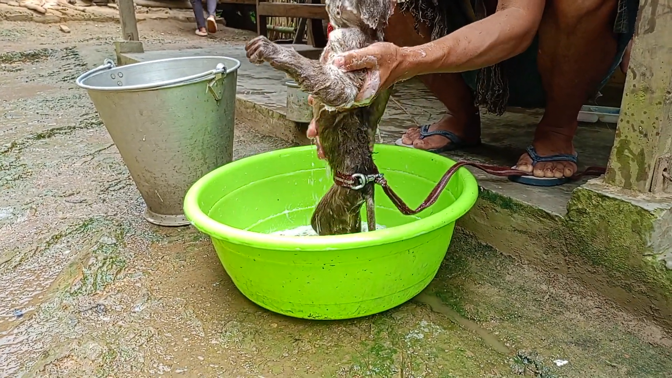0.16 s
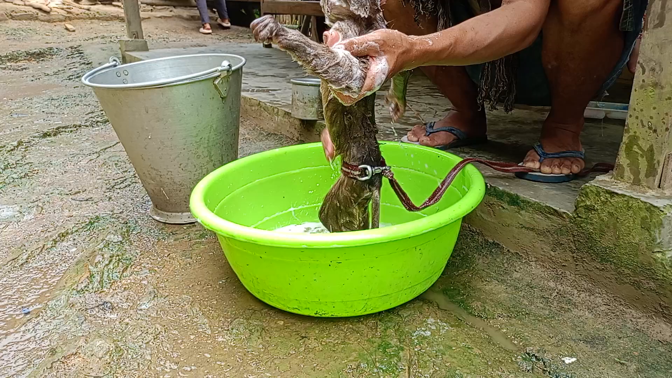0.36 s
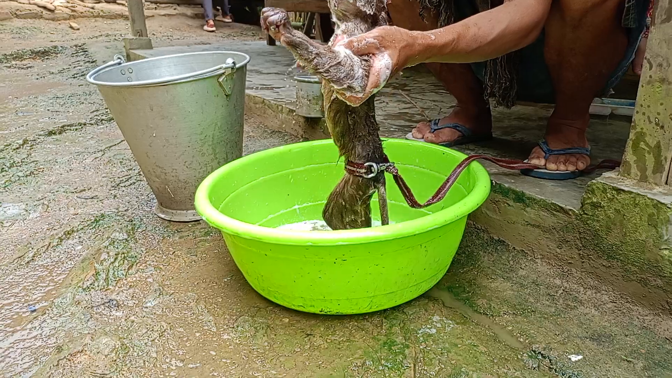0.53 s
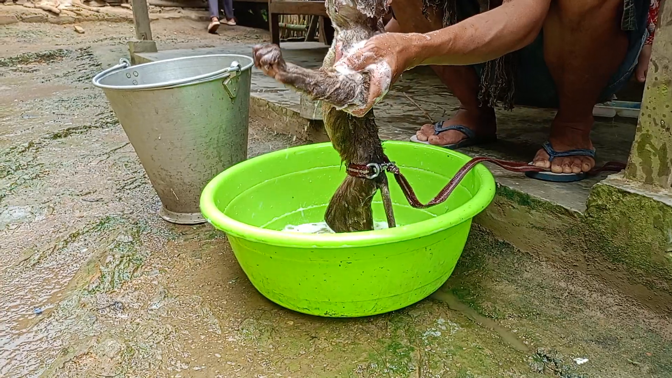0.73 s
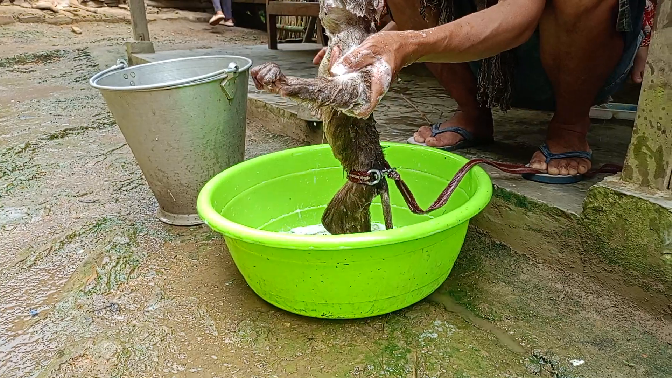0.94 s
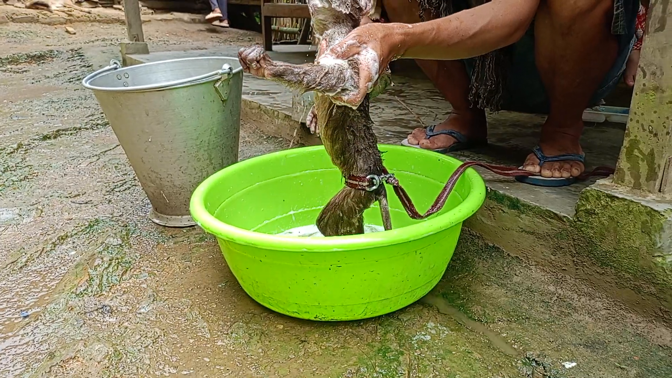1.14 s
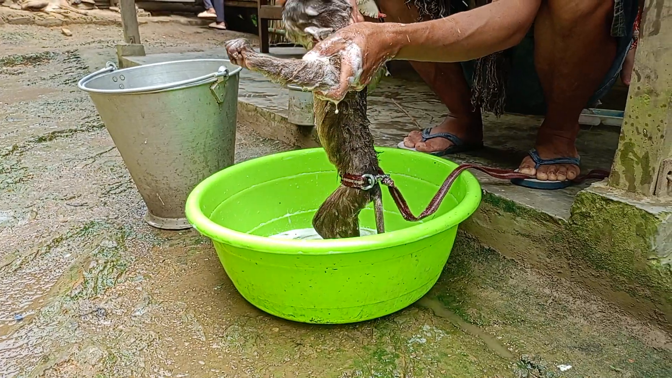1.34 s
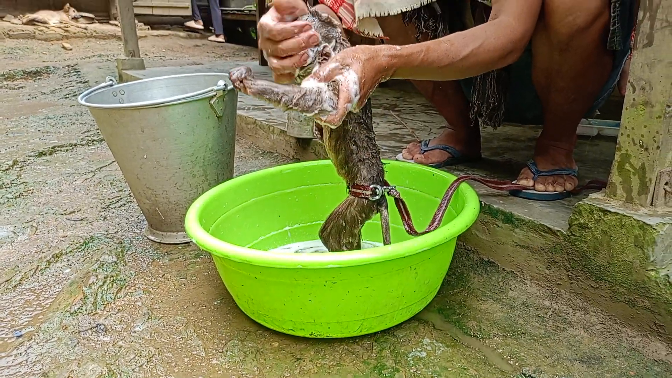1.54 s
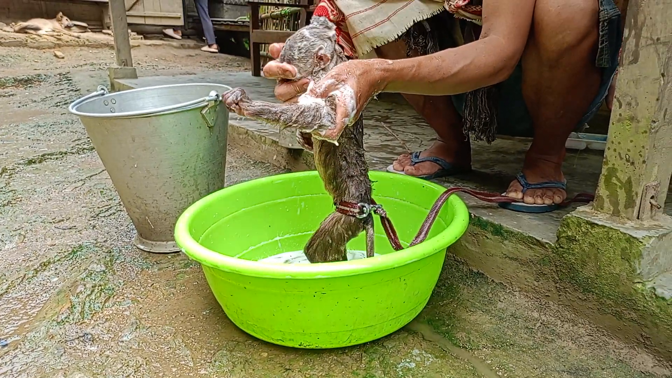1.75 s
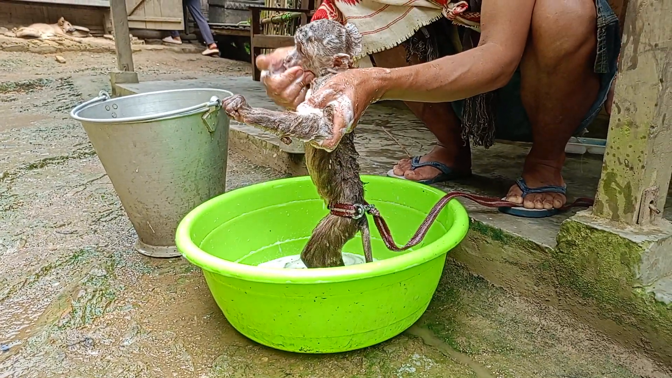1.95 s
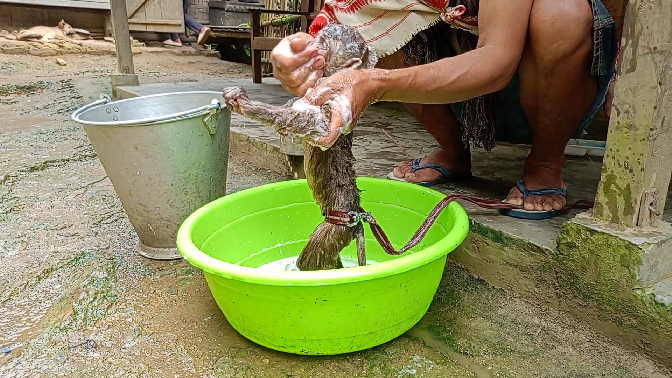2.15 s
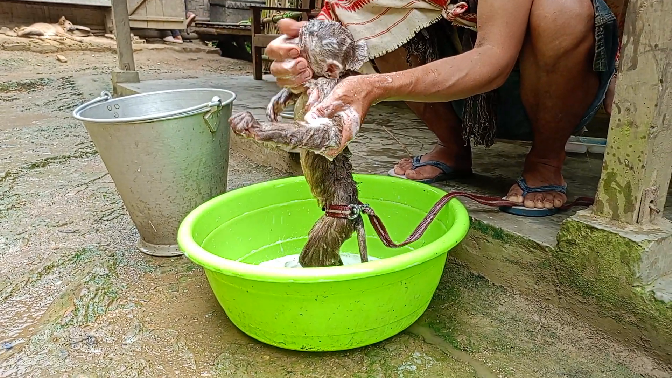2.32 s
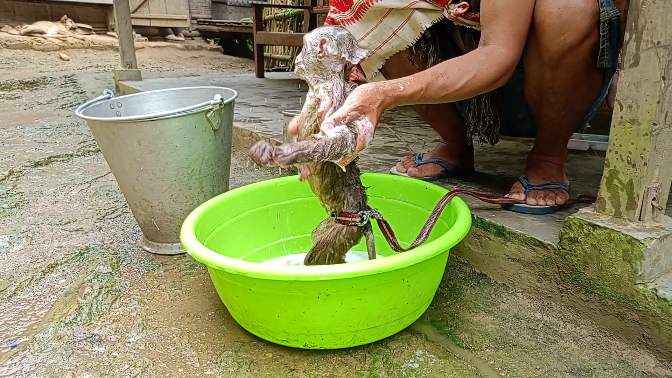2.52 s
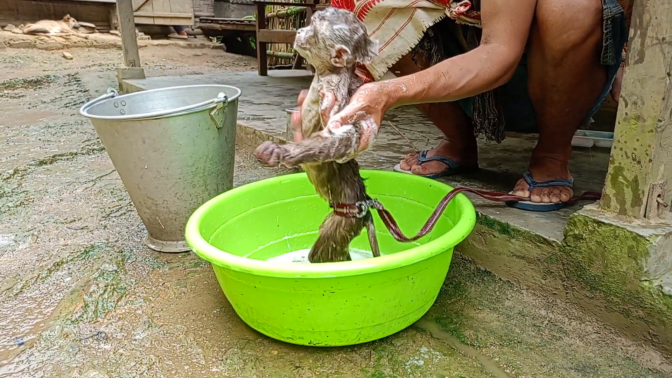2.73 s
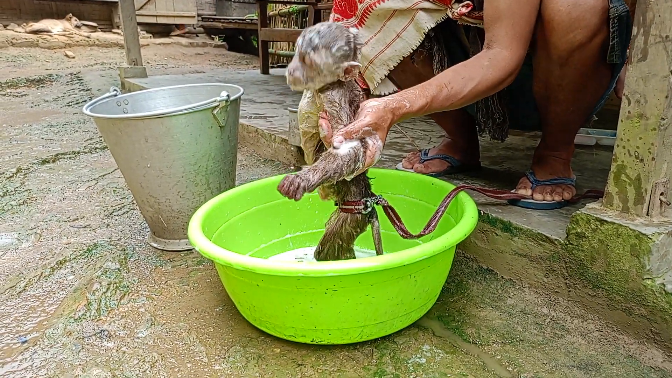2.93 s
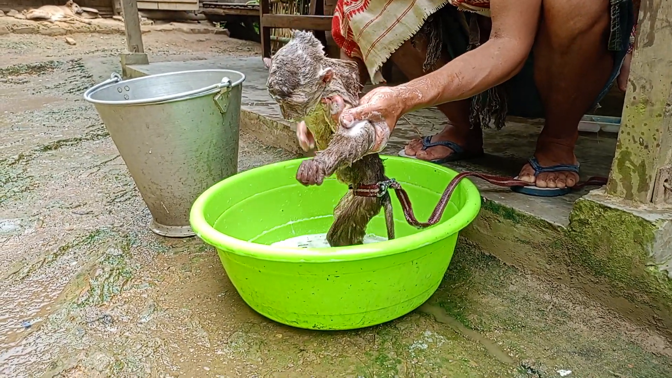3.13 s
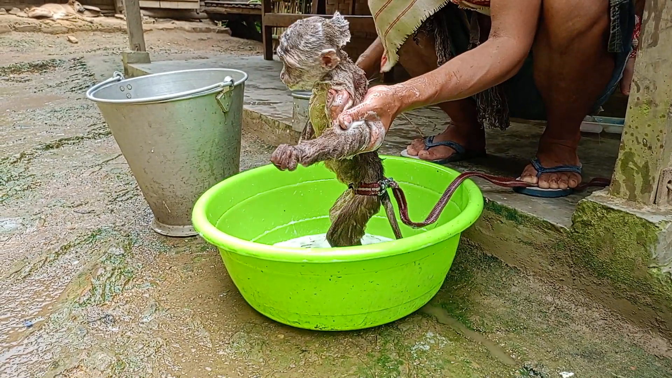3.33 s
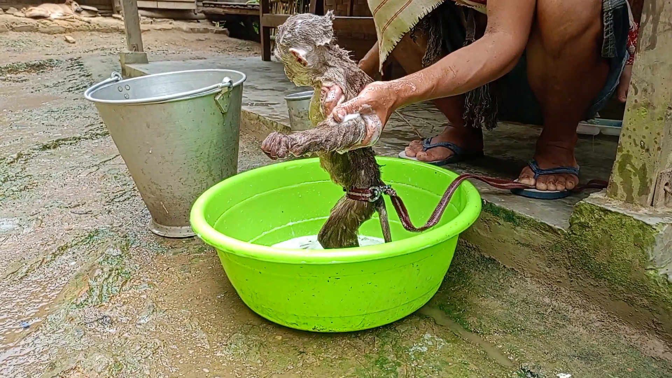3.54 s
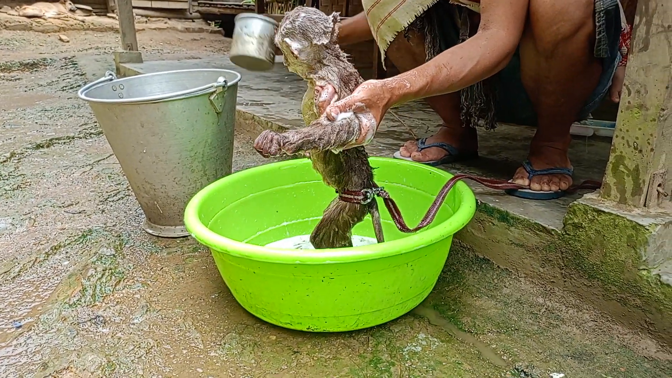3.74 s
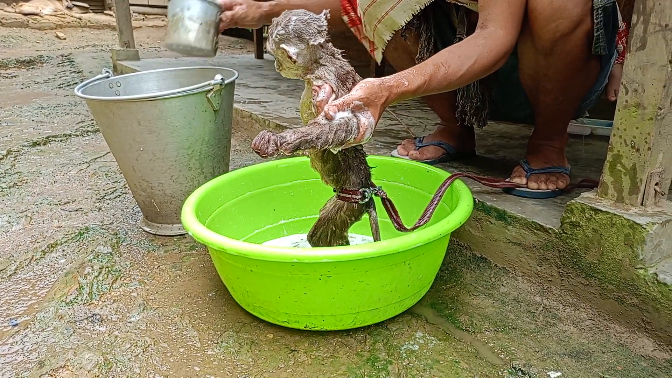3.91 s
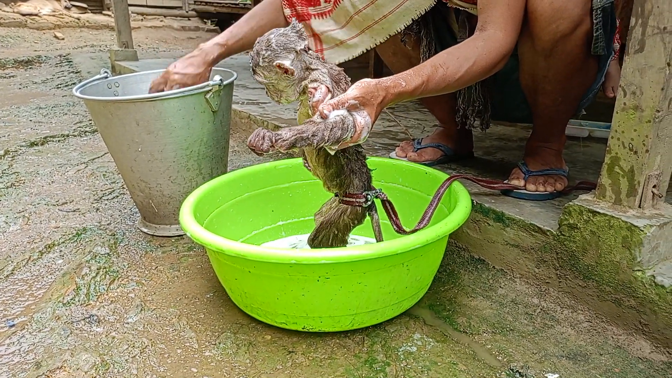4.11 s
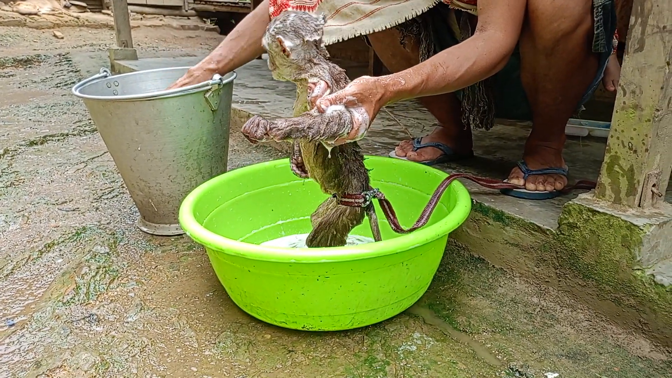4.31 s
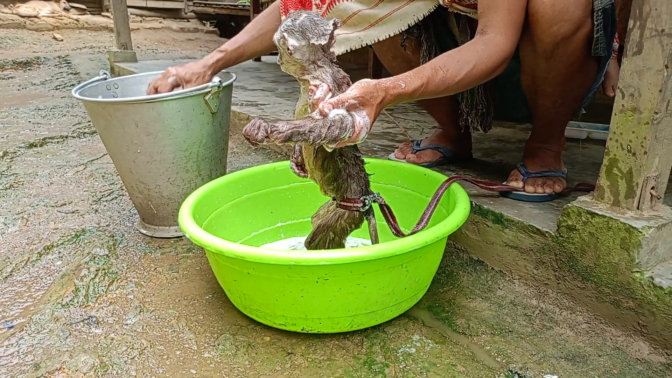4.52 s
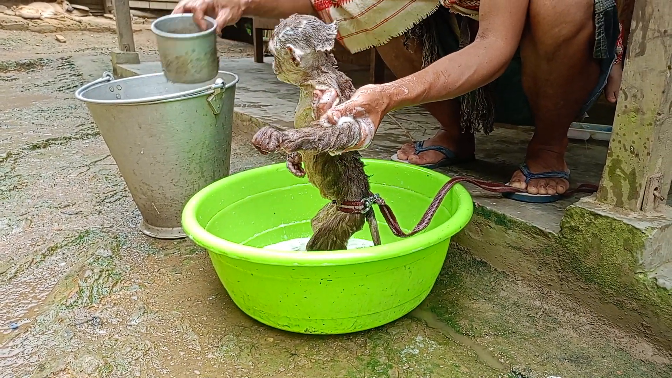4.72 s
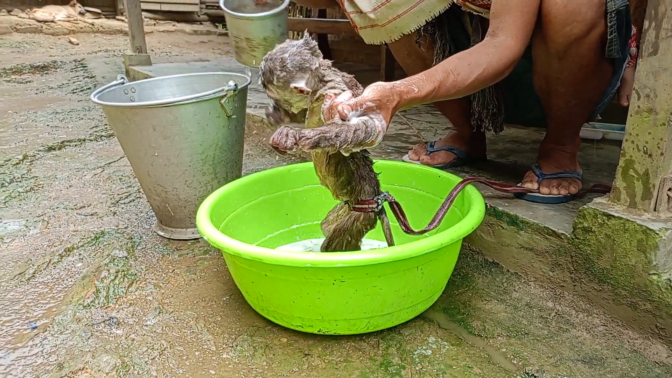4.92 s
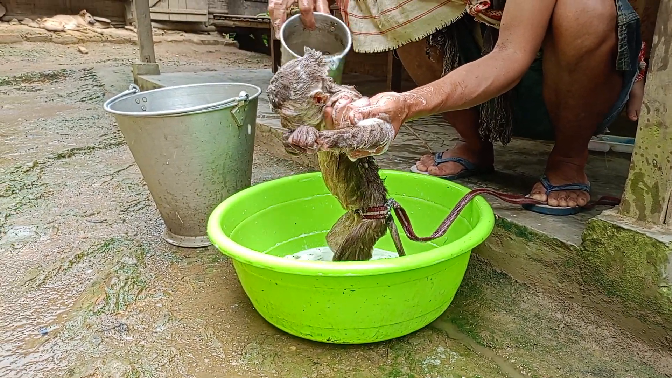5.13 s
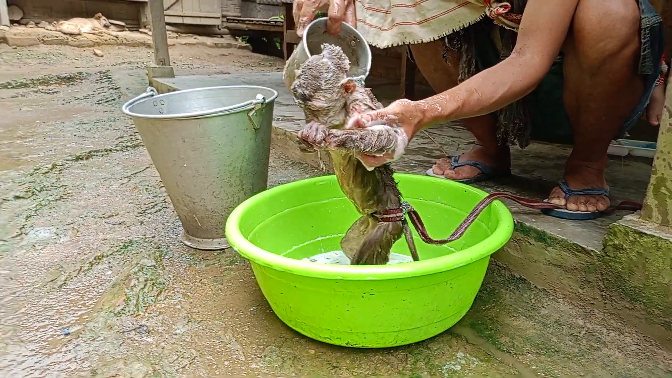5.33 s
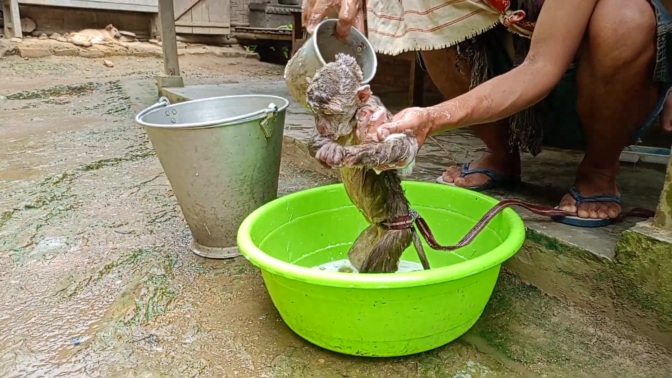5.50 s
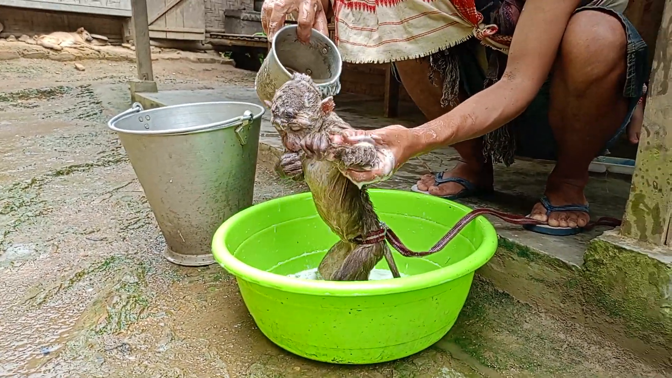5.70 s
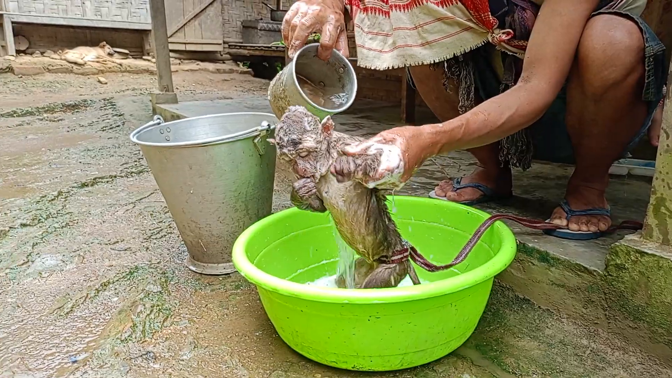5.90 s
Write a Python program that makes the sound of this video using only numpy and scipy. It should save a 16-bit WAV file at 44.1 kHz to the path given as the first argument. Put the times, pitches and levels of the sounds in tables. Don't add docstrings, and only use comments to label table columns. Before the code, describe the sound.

Steady insect hiss in a yard, soft wet rubbing and small slaps, then a metal cup knocks, plunges into a bucket, clanks out and drips.

```python
import sys
import numpy as np
from scipy import signal
from scipy.fft import rfft, irfft
from scipy.io import wavfile
from scipy.ndimage import uniform_filter1d

SR = 44100
rng = np.random.default_rng(int(sys.argv[2]) if len(sys.argv) > 2 else 0)


def wav_record(signal):
    frames = np.transpose(np.atleast_2d(signal))
    bounded = np.clip(frames, -1, 1)
    quanta = np.round(bounded * 32767).astype(np.int16)
    wavfile.write(sys.argv[1], SR, quanta)


def decibels_to_gain(level_db):
    exponent = np.asarray(level_db, float) / 20
    return 10 ** exponent


N = 267246

# pitch_hz, level_db (per Hz)
FAR_WATER = [(18, -65), (40, -34), (90, -18), (380, -18.5), (430, -13), (500, -13), (620, -13.5),
             (1000, -14), (1750, -10.5), (1900, -7.5), (2000, -0.5), (2120, -15.5), (2400, -91)]
# pitch_hz, level_db (per Hz)
LOW_INSECTS = [(1700, -77), (2150, -6.5), (2350, 0), (3050, -1.5), (3350, -5.5), (3800, -2.5), (4300, -6.5),
               (4600, -17.5), (5000, -21), (6300, -21.5), (7300, -17), (7900, -99)]
# pitch_hz, level_db (per Hz)
CICADAS = [(6800, -89), (7400, -16.5), (7700, -11), (8800, -8.5), (9200, -16.5), (9500, -22.5),
           (10500, -28.5), (11000, -40.5), (12300, -45.5), (13600, -55), (14900, -38), (15750, -43),
           (15850, -92)]
# time_s, level_db
RUBBING = [(0, -51), (.5, -53), (.8, -52), (1.0, -55.5), (1.28, -56), (1.34, -53), (1.62, -52.5),
           (2.75, -54.5), (3.3, -53.5), (4.1, -54), (4.92, -51.5), (5.25, -52.5), (6.06, -51.5)]
# pitch_hz, share_0_to_1
RUBBING_SHARE = [(900, 0.18), (1400, 0.85), (2200, 0.84), (4200, 0.7), (5500, 0), (9000, 0.33)]
YARD_DB, PATCHY_DB = -53, 1.25
SWELL_DB, SWELL_S, SWELL_TOP_S, TIRE_DB_PER_S = 0.7, 1.75, 1.0, -.25

CRICKET_STARTS = [.034, .216, .606, .75, .832, .959, 1.059, 1.097, 1.226, 1.332, 1.69, 1.813, 1.859, 1.93,
                  2.014, 2.278, 2.406, 2.46, 2.909, 3.293, 3.558, 3.787, 4.517, 4.914, 4.957, 5.096, 5.149,
                  5.281, 5.455, 5.905]
CRICKET_HZ, CRICKET_DB, CRICKET_UNEVEN_DB = 12300, -81, 1

# start_s, boom_db, gulp_db
SLOSHES = [
    (0.309, -86, -93),
    (4.148, -45.5, -46),
    (4.455, -64, -49),
    (5.479, -76, -77),
    (5.97, -72, -83),
]
# pitch_hz, width_hz, level_db
BUCKET_BOOM = [(94, 35, -2.5), (139, 40, 0), (195, 70, -2.5)]
# pitch_hz, width_hz, level_db
CUP_AIR = [(255, 110, 4), (322, 16, 4), (330, 34, 1)]
SLOSH_RISE_S, BOOM_T60_S, GULP_T60_S = 0.019, 0.53, 0.3

# start_s, rise_s, hold_s, level_db, t60_s
SPLASHES = [
    (4.144, 0.03, 0.025, -30, 0.22),
    (4.459, 0.0073, 0.023, -33, 0.27),
    (4.656, 0.015, 0.052, -44.5, 0.091),
    (4.704, 0.0093, .002, -32, 0.15),
    (4.795, 0.018, 0.0016, -33.5, 0.15),
    (6.029, 0.017, .003, -41, .15),
    (0.316, 0.012, 0.025, -53, 0.096),
]
# pitch_hz, width_hz, level_db
PLUNGE_RINGS = [(820, 32, -11), (1190, 18, -4.5), (1610, 43, -4), (1960, 52, -6), (2290, 140, -6.5),
                (2850, 35, -5), (3080, 18, -14), (3270, 38, -8.5), (3450, 52, -5.5), (3780, 23, -8),
                (4290, 79, -22)]
FILL_RINGS = [(620, 35, -4), (814, 55, -3), (1096, 39, -6.5), (1270, 31, -9), (1660, 300, -11),
              (2010, 50, -5.5), (2110, 39, -6), (2600, 43, -7), (2850, 100, -8.5), (3300, 67, -8.5),
              (4360, 45, -12), (5130, 25, -37)]
LIFT_RINGS = [(710, 18, 3), (1600, 39, -4), (2010, 72, -2.5), (2400, 140, -11), (2800, 60, 1),
              (2930, 28, -3), (3320, 16, -2), (3550, 48, -12), (3890, 56, -42), (5860, 50, -28)]
DRAIN_RINGS = [(885, 46, 1), (1200, 78, -3), (1910, 190, -9.5), (2430, 140, -12), (2890, 58, -6),
               (3380, 130, -13.5), (4740, 19, -27), (5600, 63, -41)]
POUR_RINGS = [(456, 34, 0), (1970, 550, 0), (2320, 81, -15), (2520, 95, -17), (2850, 81, 4.5),
              (3400, 33, -20)]
SUDS_RINGS = [(1076, 22, -3), (1522, 17, -4), (1980, 56, -23), (2940, 60, -3), (4100, 31, -13)]
SPLASH_RINGS = [PLUNGE_RINGS, FILL_RINGS, LIFT_RINGS, LIFT_RINGS, DRAIN_RINGS, POUR_RINGS, SUDS_RINGS]
SPLASH_FOAM = [0.54, 0.55, 0.4, 0.36, 0.38, 0.31, 0.29]

# start_s, level_db, pitch_hz, t60_ms
DRIPS = [(.322, -52, 1068, 100), (.328, -52, 1540, 97), (.332, -49, 3068, 30), (.348, -51, 1523, 80),
         (.351, -41, 2840, 30), (.367, -49, 2940, 25), (.852, -57.5, 1565, 96), (1.726, -54.5, 1200, 36),
         (1.737, -57, 2020, 43), (1.798, -52.5, 1530, 40), (3.2403, -26.5, 2480, 10),
         (3.2431, -33, 2400, 14), (3.2463, -33, 2420, 12), (3.243, -47.5, 1626, 134), (5.64, -58, 790, 34),
         (5.658, -54, 850, 29), (5.782, -52, 1830, 120), (5.79, -52.5, 1030, 23), (5.977, -43, 3080, 30)]
DRIP_CYCLES, DRIP_GLIDE = 3.7, 0.019

# start_s, level_db, t60_s, fineness_db (top band over middle, middle over low)
FIZZES = [(.345, -82, .1, 11), (.364, -68, .02, 8), (2.422, -87, .04, 11), (2.59, -72, .05, 6),
          (2.787, -61, .015, 1), (3.109, -74, .06, 11), (3.128, -74, .08, 11), (3.15, -74, .05, 11),
          (3.58, -93, .4, 8), (4.165, -70.5, .17, 1), (4.253, -49.5, 0.013, 6), (4.261, -56.5, 0.098, 4),
          (4.458, -58.5, 0.19, 2), (4.642, -79, .3, 11), (4.703, -63, .07, 7), (4.747, -81, .1, 11),
          (4.8085, -55, .012, 11), (4.812, -65, 0.11, 13), (5.494, -85, .06, 11), (5.657, -70, .06, -9),
          (5.752, -88, .04, 13), (5.986, -64, 0.024, 3), (6.035, -78, .1, 11)]
# pitch_hz, width_hz, level_db
FIZZ_BANDS = [(10800, 770, 2), (12900, 2900, -8), (15150, 1500, -3)]
SPILL_HZ, SPILL_WIDTH_HZ, SPILL_DB = 7200, 5100, 2.5

# start_s, level_db, t60_s, centre_hz
SHIMMERS = [(.364, -66, .046, 12300), (.55, -71, 0.9, 5800), (3.109, -65, .06, 12900),
            (3.241, -65, .03, 12800), (4.415, -49.5, 0.36, 2110), (4.424, -52, 0.14, 2380),
            (4.494, -53, 0.17, 4800), (4.51, -52.5, 0.11, 5700), (4.674, -57, .15, 6000),
            (4.809, -50.5, 0.079, 7300), (6.033, -65, .05, 12900)]
# start_s, level_db, t60_s, centre_hz
SLAPS = [(.37, -58, .04, 6250), (.845, -44, .04, 2850), (2.59, -47, 0.032, 2400), (2.59, -51, .02, 7960),
         (1.311, -53, 0.22, 2340), (1.545, -44.5, 0.17, 2800), (1.737, -44, 0.065, 2450),
         (2.242, -47, 0.043, 2700), (3.246, -39.5, 0.038, 2270), (4.148, -55, .04, 1400),
         (4.25, -69, 0.092, 5800), (4.465, -52.5, 0.31, 5500), (5.384, -46.5, 0.041, 2820),
         (5.502, -46, 0.052, 2940), (5.987, -49, .023, 2600), (4.16, -39, 0.28, 2600)]
SHIMMER_WIDTH, SLAP_WIDTH = 0.083, 0.43

# start_s, level_db, pitch_hz, t60_ms, pitch_rise_share
THUMPS = [(.635, -58, 124, 280, 0.42), (0.66, -66, 200, 210, 0.6), (0.63, -64.5, 200, 360, 0.027),
          (0.81, -69.5, 185, 860, -0.08), (1.628, -63.5, 100, 140, -.14), (1.632, -65.5, 147, 180, .05),
          (4.215, -49.5, 152, 300, -.12), (4.268, -44.5, 136, 200, 0.03), (4.36, -61.5, 150, 270, 0.08),
          (4.15, -62, 82, 200, 0.086), (5.98, -71, 62, 410, .02), (1.63, -68, 80, 250, -.2),
          (1.775, -80, 69, 190, 0.017)]
# start_s, level_db, pitch_hz, t60_ms, pitch_rise_share
GULPS = [(4.16, -37.5, 335, 75, 0.016), (4.156, -38, 185, 80, 0.12), (4.16, -49, 471, 260, -0.047),
         (4.172, -41.5, 111, 130, 0.6), (4.222, -49, 215, 130, 0.086), (4.475, -45, 326, 90, .03),
         (4.474, -43, 392, 100, -0.032), (4.505, -45.5, 318, 160, 0.041), (4.545, -57, 258, 150, .01),
         (4.548, -63, 330, 180, -0.12), (4.4, -58.5, 145, 310, 0.11), (4.48, -60, 146, 100, -0.11),
         (4.611, -65, 100, 170, .2), (4.66, -67, 92, 310, -0.05), (4.75, -67, 400, 250, .01)]
# start_s, level_db, pitch_hz, t60_ms, pitch_rise_share
CLOSING_POCKETS = [(4.225, -54, 1200, 280, .16), (4.248, -58, 4200, 260, 0.032),
                   (4.255, -55, 1200, 110, .05), (4.17, -50, 4330, 200, 0.019), (4.18, -47, 830, 170, 0.01),
                   (4.525, -49.5, 1000, 140, 0.098), (4.548, -50, 920, 81, .03),
                   (4.56, -59, 820, 110, 0.038), (4.52, -52, 1400, 130, .03)]
THUMP_RISE = 0.088

# start_s, level_db,
# pitch_hz, t60_ms, pitch_rise_share
STRIKES = [(4.709, -19.5, 987, 21, -0.027), (4.7105, -24, 773, 69, -0.011), (4.802, -26.5, 1035, 45, 0.2),
           (6.0316, -37, 1860, 21, -0.00096), (.8408, -39, 2850, 12, .01), (.8448, -44, 3000, 16, .02),
           (.8482, -45, 2900, 18, .02), (4.147, -41, 2880, 25, 0.025), (4.149, -43, 1186, 90, 0.057),
           (4.459, -34.5, 271, 40, 0.05)]
STRIKE_CYCLES = 2.4

# start_s, level_db, pitch_hz, t60_ms
KNOCKS = [(.96, -55, 695, 37), (.972, -50, 589, 68), (1.006, -60.5, 630, 160), (1.045, -48, 599, 54),
          (1.068, -52, 645, 95), (1.19, -58.5, 620, 77), (3.5786, -38.5, 626, 27), (3.585, -33, 622, 25),
          (3.586, -51, 953, 60), (3.611, -53, 957, 45), (3.6022, -35, 604, 38), (3.6075, -40, 603, 28),
          (3.617, -44, 651, 43), (3.634, -42, 620, 70), (3.633, -35.5, 1003, 79), (3.651, -42.5, 1016, 81),
          (3.661, -50.5, 620, 58), (3.679, -50.5, 1020, 70), (3.699, -52, 1010, 36), (3.69, -58, 600, 110),
          (3.735, -60, 610, 80), (3.595, -52, 1910, 22), (3.611, -53, 1862, 22), (3.629, -55, 1841, 60),
          (3.652, -59, 1270, 140)]
KNOCK_RISE_MS = 12.7

# start_s, level_db, pitch_hz, t60_ms
PLUNGE_POCKETS = [(4.16, -33, 2180, 37), (4.164, -31, 3240, 35), (4.165, -37.5, 860, 57),
                  (4.166, -32.5, 1164, 61), (4.167, -35, 2650, 35), (4.168, -36, 3010, 35),
                  (4.171, -31.5, 1547, 62), (4.172, -33, 1916, 47), (4.175, -34, 2094, 35),
                  (4.176, -31, 3477, 35), (4.18, -39, 2770, 57), (4.18, -46, 1200, 38),
                  (4.184, -41, 3165, 35), (4.186, -33, 1528, 35), (4.187, -41, 3875, 35),
                  (4.191, -38, 2160, 35), (4.193, -35, 2424, 35), (4.194, -34, 1894, 35),
                  (4.196, -37, 3003, 35), (4.198, -44, 3380, 47), (4.201, -44, 835, 35),
                  (4.201, -39, 1605, 32), (4.203, -37, 2870, 35), (4.207, -44, 3466, 97),
                  (4.21, -40, 2530, 37), (4.211, -47, 1160, 35), (4.213, -33, 1730, 40),
                  (4.214, -43, 3240, 35), (4.222, -50, 2880, 77), (4.223, -41, 2320, 32),
                  (4.229, -42, 1690, 35), (4.239, -40, 2230, 35)]
# start_s, level_db, pitch_hz, t60_ms
FILL_POCKETS = [(4.449, -35, 1270, 57), (4.457, -33, 833, 31), (4.459, -29, 1985, 35),
                (4.46, -39, 2910, 35), (4.462, -34, 1060, 47), (4.463, -42, 1704, 35),
                (4.466, -42, 3143, 57), (4.468, -32, 2590, 38), (4.472, -41, 1630, 87),
                (4.472, -41, 2930, 100), (4.475, -25, 592, 110), (4.477, -45, 3320, 35),
                (4.48, -36, 830, 33), (4.481, -36, 2487, 35), (4.481, -43, 3154, 37),
                (4.482, -34.5, 2204, 87), (4.483, -35, 2740, 35), (4.489, -43, 1636, 37),
                (4.491, -43, 3208, 67), (4.5, -44, 2010, 37), (4.504, -44, 2860, 35), (4.505, -48, 613, 35),
                (4.505, -43, 2508, 35), (4.526, -43.5, 699, 35)]
POCKET_RISE_MS, POCKET_GLIDE = 7, 0.0093

# start_s, level_db, pitch_hz, t60_ms
CLANKS = [(4.62, -52, 1560, 64), (4.64, -50, 1270, 60), (4.645, -51.5, 660, 100), (4.671, -40, 1610, 92),
          (4.685, -41, 2800, 25), (4.697, -30, 1270, 38), (4.712, -32.5, 1970, 37), (4.72, -32, 1103, 36),
          (4.708, -36.5, 1630, 60), (4.712, -27, 2836, 35), (4.734, -33.5, 873, 120),
          (4.74, -39.5, 2010, 60), (4.789, -39, 955, 60), (4.807, -28.5, 1217, 34), (4.802, -41, 1798, 32),
          (4.81, -36.5, 872, 64), (4.83, -48, 1144, 60), (4.821, -42, 825, 110), (4.847, -48, 1316, 81),
          (4.977, -47, 2960, 150), (6.047, -44, 2030, 50), (6.034, -52, 462, 100), (6.044, -32.5, 2880, 55),
          (6.045, -50, 804, 130)]
CLANK_CYCLES = 6.1

# start_s, level_db, rise_s, t60_s, pitch_hz
CUP_RINGS = [(4.68, -61.5, .02, 0.3, 5690), (4.805, -57.5, 0.013, 0.38, 4460),
             (4.82, -64, 0.012, 0.17, 5540), (4.81, -56.5, 0.031, 1.15, 3550),
             (4.96, -50, 0.044, 0.51, 3550), (5.08, -59.5, 0.071, 0.96, 3550)]
RIM_BLUR, RIM_STEADY = 30, 0.53

# pitch_hz, t60_s
PORCH_DECAY = [(200, 0.11), (1000, 0.18), (4000, 0.095), (12000, 0.12)]
PORCH_DB = -14.5

DUCK_FROM_DB, DUCK_SHARE, RECOVER_DB_PER_S, DUCK_BELOW_HZ = -50.5, 0.095, 54, 1500
EDGE_HZ = 15830


def evened(x):
    return x / np.sqrt(np.mean(x ** 2) + 1e-20)


def read(points, hz):
    f, value = np.transpose(points)
    return np.interp(np.log(hz + 1), np.log(f + 1), value)


def add(mix, s, sound):
    part = mix[round(s * SR):][:len(sound)]
    part += sound[:len(part)]


def envelope(t, rise, hold, db, t60):
    fall_s = np.maximum(t - rise - hold, 0)
    return np.clip(t / rise, 0, 1) * decibels_to_gain(db - 60 * fall_s / t60)


def band(x, lo_hz, hi_hz):
    return signal.sosfilt(signal.butter(3, [lo_hz, hi_hz], "bandpass", fs=SR, output="sos"), x)


def body(x, modes):
    out = 0
    for k, (hz, width, db) in enumerate(modes):
        ring = signal.lfilter(*signal.iirpeak(hz, hz / max(width, 10), SR), x)
        out = out + (-1) ** k * decibels_to_gain(db) * ring
    return out


def droplets(length, per_s, spread_db):
    hit, size, sign = rng.random((3, length))
    strength = decibels_to_gain(-spread_db * np.log(size + 0.013))
    return evened((hit < per_s / SR) * strength * np.sign(sign - .5))


def yard():
    frames, hz = N // 128 + 5, np.fft.rfftfreq(512, 1 / SR)
    t = np.arange(frames) * 128 / SR
    a, b, patches = rng.standard_normal((frames, 257, 3)).T
    patches = evened(uniform_filter1d(uniform_filter1d(patches, 6, 0), 22, 1))
    flicker = evened(uniform_filter1d(rng.exponential(1, frames) - 1, 3))

    s, rub_db = np.transpose(RUBBING)
    rub_db = np.interp(t, s, rub_db - np.median(rub_db)) + 0.21 * flicker
    rub_db = read(RUBBING_SHARE, hz)[:, None] * rub_db
    cicada_db = SWELL_DB * np.cos(2 * np.pi * (t - SWELL_TOP_S) / SWELL_S) + TIRE_DB_PER_S * (t - 2)
    cicada_db = (hz > 7200)[:, None] * cicada_db

    spectra = (a + 1j * b) * decibels_to_gain(PATCHY_DB * patches + rub_db + cicada_db)
    white = signal.istft(spectra, nperseg=512, noverlap=384)[1][:N]
    white = evened(white) + 0.21 * droplets(N, 400, 2.9)
    fine_hz = np.fft.rfftfreq(N, 1 / SR)
    colour = sum(decibels_to_gain(read(layer, fine_hz)) for layer in (FAR_WATER, LOW_INSECTS, CICADAS))
    return decibels_to_gain(YARD_DB) * evened(irfft(rfft(white) * colour, N))


def chirp(s):
    buzz = body(rng.standard_normal(900), [(CRICKET_HZ, 350, 0)])
    buzz = band(buzz, CRICKET_HZ - 400, CRICKET_HZ + 400)
    db = CRICKET_DB - 10.0 + CRICKET_UNEVEN_DB * rng.standard_normal()
    return s, decibels_to_gain(db) * evened(buzz) * np.hanning(900)


def slosh(s, boom_db, gulp_db):
    t = np.arange(0, .5, 1 / SR)
    settle = 4000
    push, pull = rng.standard_normal((2, len(t) + settle))
    boom = evened(band(body(push, BUCKET_BOOM), 77, 257))[settle:]
    gulp = evened(band(body(pull, CUP_AIR), 223, 550))[settle:]
    boom = envelope(t, SLOSH_RISE_S, 0, boom_db, BOOM_T60_S) * boom
    gulp = envelope(t, SLOSH_RISE_S, 0, gulp_db, GULP_T60_S) * gulp
    return s, (boom + gulp) * np.clip((t[-1] - t) * 10, 0, 1)


def foam(length, rings):
    t, out = np.arange(500) / SR, np.zeros(length)
    for hz, width, db in rings * 3:
        pitch = hz * rng.uniform(0.901, 1.171)
        shape = np.exp(-t * pitch / 4.5) * np.minimum(t * pitch / 1.5, 1)
        grain = np.sin(2 * np.pi * pitch * t * (1 + 0.84 * t)) * shape
        out += decibels_to_gain(1.67 * db) * signal.oaconvolve(droplets(length, 120, 3.9), evened(grain))[:length]
    return evened(out)


def splash(row, rings, froth):
    s, rise, hold, db, t60 = row
    t = np.arange(0, .35, 1 / SR)
    drops = droplets(len(t), 6000, 2.3)
    churn = (1 - froth) * evened(body(drops, rings)) + froth * foam(len(t), rings)
    churn = band(churn, 0.85 * rings[0][0], 1.29 * rings[-1][0])
    fade_out = np.clip((t[-1] - t) * 20, 0, 1)
    return s, envelope(t, rise, hold, db, t60) * churn * fade_out


def bubble(s, db, hz, rise_ms, t60_ms, glide):
    t_ms = np.arange(0, (rise_ms + t60_ms) / 1000, 1 / SR) * 1000
    swell = np.sin(np.pi / 2 * np.clip(t_ms / rise_ms, 0, 1)) ** 2
    pitch = hz * (1 + glide * np.clip(t_ms / (rise_ms + t60_ms / 3), 0, 1))
    smooth = np.hanning(round(max(500, 10 * SR / hz)))
    tremble = evened(signal.oaconvolve(rng.standard_normal(len(t_ms)), smooth, "same"))
    tremble_db = np.minimum(1 + t_ms / 90, 2.5) * np.tanh(tremble)
    decay = decibels_to_gain(db - 60 * np.maximum(t_ms - rise_ms, 0) / t60_ms)
    return s, swell * decibels_to_gain(tremble_db) * decay * np.sin(2 * np.pi * np.cumsum(pitch) / SR)


def drip(s, db, hz, t60_ms):
    return bubble(s, db, hz, 1000 * DRIP_CYCLES / hz, t60_ms, DRIP_GLIDE)


def spray(s, db, t60, hz, width):
    t, f = np.arange(8192) / SR, np.fft.rfftfreq(8192, 1 / SR)
    drops = droplets(8192, 5000, 3.2)
    crackle = irfft(rfft(drops) * np.exp(-2 * ((f - hz) / width) ** 2))
    onset = np.clip(t * width / 0.6, 0, 1)
    tick = 1 + 0.5 * np.exp(-t / 0.0014)
    shape = onset * tick * decibels_to_gain(-60 * t / max(t60, .01))
    return s, decibels_to_gain(db - 2.5) * evened(crackle * shape) * np.sqrt(np.mean(shape ** 2))


def fizz(s, db, t60, fine_db):
    spill = spray(s, db - 0.69 * fine_db + SPILL_DB, t60, SPILL_HZ, SPILL_WIDTH_HZ)[1]
    high = 0
    for k, (hz, width, band_db) in enumerate(FIZZ_BANDS):
        high = high + spray(s, db + band_db + (k - 1) * fine_db, t60, hz, width)[1]
    return s, spill + high


def shimmer(s, db, t60, hz):
    return spray(s, db, t60, hz, SHIMMER_WIDTH * hz)


def slap(s, db, t60, hz):
    return spray(s, db, t60, hz, SLAP_WIDTH * hz)


def thump(s, db, hz, t60_ms, glide):
    return bubble(s, db, hz, THUMP_RISE * t60_ms, t60_ms, glide)


def strike(s, db, hz, t60_ms, glide):
    note = bubble(s, db, hz, 1000 * STRIKE_CYCLES / hz, t60_ms, glide)[1]
    return s, band(note, 0.83 * hz, 2.8 * hz)


def knock(s, db, hz, t60_ms):
    return bubble(s, db, hz, KNOCK_RISE_MS, t60_ms, 0)


def pocket(s, db, hz, t60_ms):
    return bubble(s, db - 2.5, hz, POCKET_RISE_MS, t60_ms, POCKET_GLIDE)


def clank(s, db, hz, t60_ms):
    return bubble(s, db, hz, 1000 * CLANK_CYCLES / hz, t60_ms, 0)


def cup_ring():
    t, out = np.arange(N) / SR, np.zeros(N)
    for s, db, rise, t60, hz in CUP_RINGS:
        mode = [(hz, RIM_BLUR / t60, 0)]
        steady = min(RIM_STEADY * t60, 1)
        rough_tone = evened(body(body(rng.standard_normal(N), mode), mode))
        steady_tone = np.cos(2 * np.pi * hz * t)
        ring = np.sqrt(1 - steady) * rough_tone + np.sqrt(2 * steady) * steady_tone
        out += ring * envelope(t - s, rise, 0, db, t60)
    return out


def porch(x):
    taps = np.zeros(SR // 2)
    at = np.arange(200, SR // 2 - 20, 20)
    taps[at + rng.integers(0, 20, len(at))] = rng.choice([-1., 1.], len(at))
    hz, t, z = signal.stft(taps, SR, nperseg=256)
    decay = decibels_to_gain(-60 * t / read(PORCH_DECAY, hz)[:, None])
    tail = signal.istft(z * decay, SR, nperseg=256)[1]
    return signal.fftconvolve(x, tail / np.linalg.norm(tail))[:N]


def ducking(near):
    power_db = 10 * np.log10(abs(uniform_filter1d(near ** 2, 400)) + 1e-12)
    fall = np.arange(N) * RECOVER_DB_PER_S / SR
    held_db = np.maximum.accumulate(power_db + fall) - fall
    over_db = np.maximum(held_db - DUCK_FROM_DB, 0)
    return decibels_to_gain(-DUCK_SHARE * uniform_filter1d(over_db, 400))


def scene():
    far, near = yard(), cup_ring()
    for parts in zip(SPLASHES, SPLASH_RINGS, SPLASH_FOAM):
        add(near, *splash(*parts))
    sources = ((thump, THUMPS), (knock, KNOCKS), (clank, CLANKS), (drip, DRIPS), (slap, SLAPS),
               (shimmer, SHIMMERS), (fizz, FIZZES), (slosh, SLOSHES), (chirp, zip(CRICKET_STARTS)),
               (pocket, PLUNGE_POCKETS), (pocket, FILL_POCKETS), (strike, STRIKES),
               (thump, GULPS), (thump, CLOSING_POCKETS))
    for source, table in sources:
        for row in table:
            add(near, *source(*row))
    low = signal.filtfilt(*signal.butter(2, DUCK_BELOW_HZ, fs=SR), far)
    ducked_far = far - (1 - ducking(near)) * low
    return (near + decibels_to_gain(PORCH_DB) * porch(near) + ducked_far)[None]


def low_pass(x):
    return signal.sosfilt(signal.butter(12, 16740, fs=SR, output="sos"), x)


def record(dry):
    edge = signal.firwin(511, EDGE_HZ, window=("kaiser", 9), fs=SR)
    limited = signal.oaconvolve(dry, edge[None], "same")
    return low_pass(limited)


dry = scene()
out = record(dry)
wav_record(out)
```